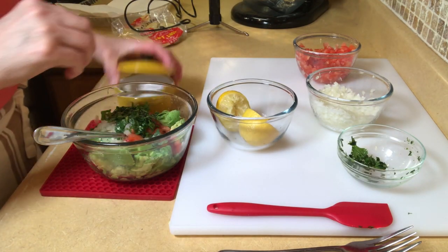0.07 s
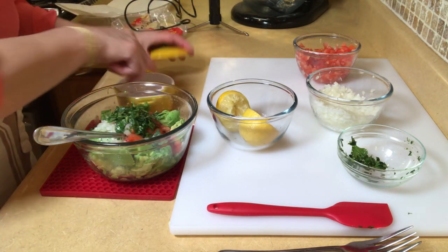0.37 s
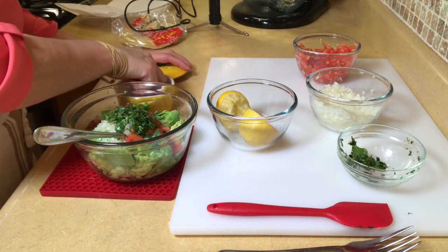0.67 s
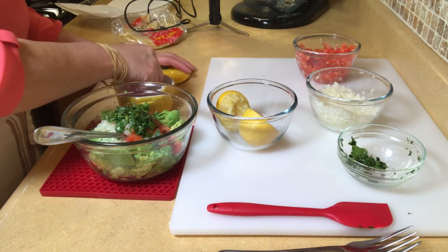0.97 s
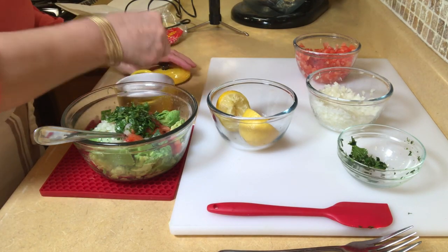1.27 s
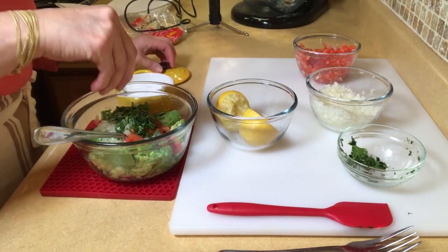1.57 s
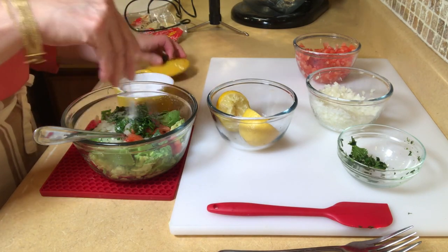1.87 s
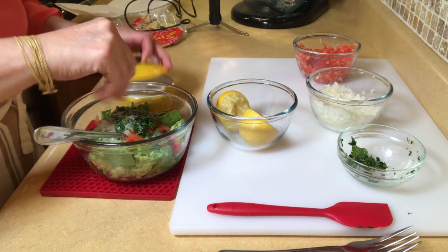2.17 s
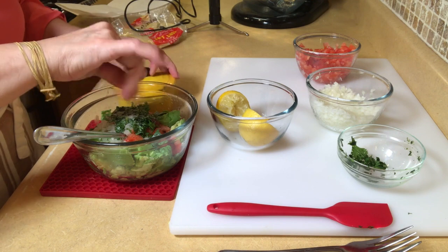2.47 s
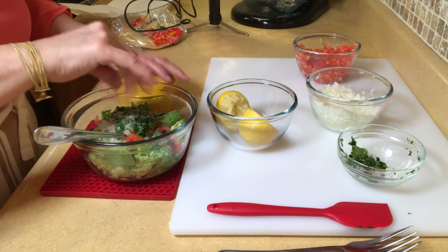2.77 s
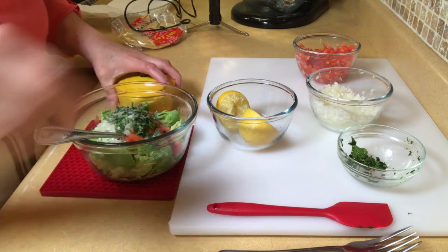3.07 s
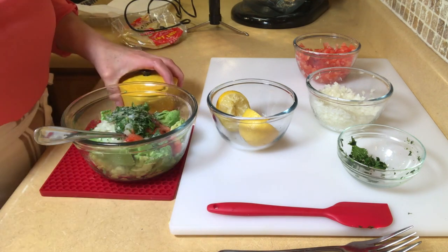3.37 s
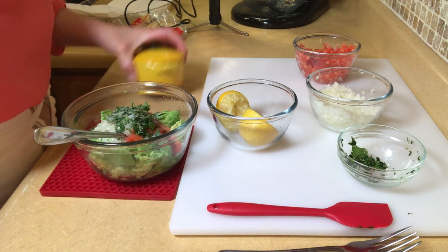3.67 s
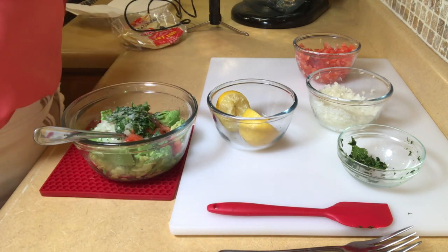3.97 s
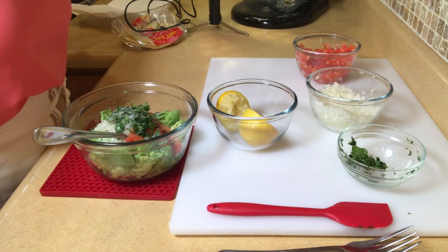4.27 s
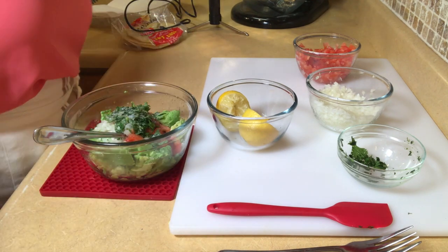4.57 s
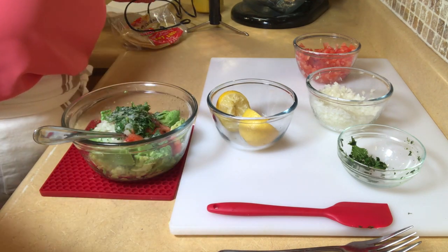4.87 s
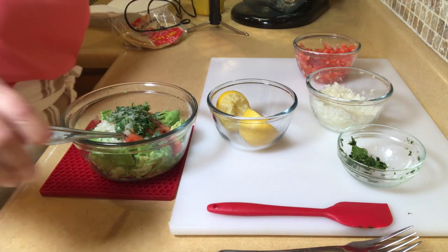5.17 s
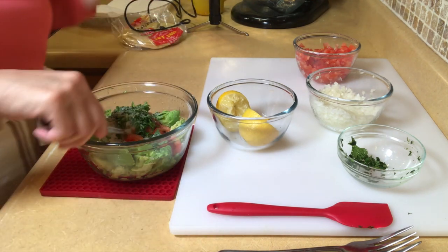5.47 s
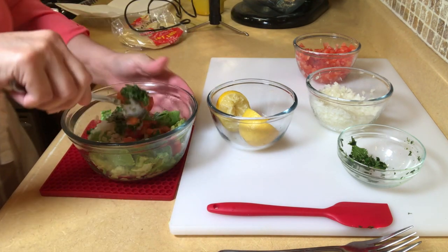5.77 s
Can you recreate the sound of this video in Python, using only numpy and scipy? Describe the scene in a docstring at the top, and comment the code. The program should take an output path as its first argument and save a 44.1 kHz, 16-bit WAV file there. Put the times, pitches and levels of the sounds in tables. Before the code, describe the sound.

A small salt cellar is set down on a kitchen counter with a knock, followed by lighter taps of its lid. Salt patters faintly onto food, then the lid goes back on with a quick cluster of ringing clinks. After a quiet stretch of soft hand slides, a hard knock shakes the counter and a spoon rattles in a glass bowl. It all sounds near, in a small, slightly reverberant kitchen with a faint appliance hum.

```python
"""Seasoning guacamole at a kitchen counter

A small lidded salt cellar is set down, opened, pinched from and closed with a clink; salt patters
on the food as a stream of tiny impacts. Later a hard knock shakes the counter and the spoon rattles
in the glass mixing bowl. Each blow excites damped modes of the countertop and the hollow cabinet
below. Hands slide and bangles tick in a small reverberant kitchen with a faint appliance hum."""
import sys
import numpy as np
from scipy import signal
from scipy.fft import rfft, irfft, next_fast_len
from scipy.io import wavfile
from scipy.ndimage import uniform_filter1d

SR = 44100
rng = np.random.default_rng(int(sys.argv[2]) if len(sys.argv) > 2 else 0)


def persist_wave(psi):
    """Save psi, clipped to +-1, as 16-bit WAV."""
    counts = np.round(np.clip(psi, -1, 1) * 32767).astype(np.int16)
    wavfile.write(sys.argv[1], SR, np.atleast_2d(counts).T)


N = 257367
TIME = np.arange(N) / SR
AGE = TIME[:SR * 3 // 5]   # time since a blow, in s


def from_db(db):
    """Amplitude ratio of a level in decibels."""
    return 10 ** (np.asarray(db) / 20)


def at_hz(points, hz):
    """Interpolation on a logarithmic frequency axis."""
    f, value = np.transpose(points)
    return np.interp(np.log(np.maximum(hz, 1)), np.log(f), value)


def add(track, s, sound):
    """Superposition: a sound joins the track at s seconds."""
    start = max(round(s * SR), 0)
    track[start:start + len(sound)] += sound[:N - start]


def low_pass(x, hz):
    """Second-order Butterworth low-pass."""
    return signal.sosfilt(signal.butter(2, min(hz, .45 * SR), fs=SR, output="sos"), x + 1e-18)


def high_pass(x, hz):
    """Fourth-order Butterworth high-pass."""
    return signal.sosfilt(signal.butter(4, hz, "high", fs=SR, output="sos"), x + 1e-18)


def coloured(source, spectrum):
    """Spectral shaping of a steady source, scaled to unit rms."""
    size = next_fast_len(len(source))
    gain = from_db(at_hz(spectrum, np.fft.rfftfreq(size, 1 / SR)))
    out = irfft(rfft(source, size) * gain, size)[:len(source)]
    return out / np.std(out)


def decay(t60):
    """Exponential damping: 60 dB are lost in t60 seconds."""
    return np.exp(-np.log(1000) * AGE / max(t60, 1e-3))


def burst(spectrum, t60):
    """Modal overlap: many modes of even strength merge into one decaying noise."""
    modes = rfft(rng.standard_normal(len(AGE)) * decay(t60))
    even = modes / np.sqrt(uniform_filter1d(abs(modes) ** 2, size=120))
    gain = from_db(at_hz(spectrum, np.fft.rfftfreq(len(AGE), 1 / SR)))
    out = irfft(even * gain, len(AGE)) * (AGE < 2 * t60)
    return out * np.sqrt(np.sum(decay(t60) ** 2) / np.sum(out ** 2))


def ring(modes, chatter=0, weight_db=lambda hz: 0, build_cycles=.01):
    """Free vibration as a sum of damped modes; contact chatter widens each line to chatter * f."""
    out = 0
    for k, (hz, db, t60) in enumerate(modes):
        phase = 2 * np.pi * hz * AGE
        if chatter:
            phase_walk = np.cumsum(rng.standard_normal(len(AGE))) * np.sqrt(2 * np.pi * chatter * hz / SR)
            phase = phase + uniform_filter1d(phase_walk, size=40)
        strength = from_db(db + weight_db(hz) + rng.standard_normal())   # no two blows are alike
        onset = 1 - np.exp(-AGE * hz / build_cycles)
        out = out + (-1) ** k * strength * np.sin(phase) * decay(t60) * onset
    return out


def grains(per_s, spread_db):
    """Shot noise: impulses of uneven size at random instants."""
    impulses = (rng.random(N) < per_s / SR) * rng.standard_normal(N)
    return impulses * from_db(spread_db * np.minimum(rng.exponential(1, N), 4))


def swells(rows):
    """Gaussian envelopes, each with a centre time, a peak level and a width (standard deviation)."""
    return sum(from_db(db) * np.exp(-.5 * ((TIME - s) / width) ** 2) for s, db, width in rows)


# spectrum of the room's air: f/Hz, level/dB
AIR_SPECTRUM = [(25, -20.5), (45, -6), (68, -9.5), (90, -5), (160, -9.5), (250, -11), (400, -14),
                (1000, -15), (1550, -18.5), (2300, -24), (4000, -29.5), (7000, -32.5), (10500, -39.5),
                (14500, -37), (16000, -44.5)]
# appliance tones: f/Hz, rms level/dB
HUM_TONES = [(60, -71.5), (120, -74), (154, -75.5)]


def room_tone(waver_rad=0.4, air_db=-65.5):
    """Background noise: broadband air and an appliance hum with slight random phase modulation."""
    hum = 0
    for hz, db in HUM_TONES:
        wander = coloured(rng.standard_normal(N), [(3, 0), (12, -25), (60, -90)])
        hum = hum + from_db(db) * np.sqrt(2) * np.sin(2 * np.pi * hz * TIME + waver_rad * wander)
    return hum + from_db(air_db) * coloured(rng.standard_normal(N), AIR_SPECTRUM)


# reverberation time of the kitchen: f/Hz, T60/s
REVERB_TIMES = [(100, 0.06), (500, 0.54), (1200, 0.43), (3500, 0.283), (8000, 0.33), (15000, 0.15)]
# energy that the kitchen returns: f/Hz, level/dB
REVERB_LEVELS = [(100, -11), (300, -6), (600, -12), (1000, -13), (1500, -10), (2200, -7), (3300, -8.5),
                 (8000, -11), (15000, -13)]
# reflections from splashback, ceiling and wall units: delay/s, level/dB
EARLY_REFLECTIONS = [(.0043, -18), (0.0117, -14), (0.017, -15.5)]


def kitchen(direct, build_s=0.0044):
    """Reverberation: early reflections and a diffuse tail that decays at its own rate in each band."""
    white = rfft(rng.standard_normal(len(AGE)))
    freqs = np.fft.rfftfreq(len(AGE), 1 / SR)
    edges = np.geomspace(40, 20000, 28)
    onset = 1 - np.exp(-(AGE / build_s) ** 2)
    tail = 0
    for low, high in zip(edges, edges[1:]):
        hz = np.sqrt(low * high)
        band = irfft(white * ((freqs >= low) & (freqs < high)), len(AGE))
        band = band * decay(at_hz(REVERB_TIMES, hz)) * onset
        unit_gain = np.sqrt(2 * (high - low) / SR / np.sum(band ** 2))
        tail = tail + from_db(at_hz(REVERB_LEVELS, hz)) * band * unit_gain
    out = direct + signal.fftconvolve(direct, tail)[:N]
    scattered = low_pass(direct, hz=2180)   # clutter breaks up the treble of the early reflections
    for delay, db in EARLY_REFLECTIONS:
        add(out, delay, from_db(db) * scattered)
    return out


# hands and cellar sliding on the counter: t/s, level/dB, width/s
SLIDE_STROKES = [(0.73, -68.5, 0.15), (0.79, -67, 0.011), (1.58, -67.5, 0.077), (1.69, -73, 0.012),
                 (1.76, -69, 0.015), (1.828, -68.5, 0.0067), (1.9, -63.5, 0.072), (3.41, -67.5, 0.088),
                 (3.63, -63.5, 0.024), (4.93, -73, 0.098)]
# spectrum of sliding: f/Hz, level/dB
SLIDE_SPECTRUM = [(200, 1), (600, 1.5), (1200, 4), (2200, -8.5), (4000, -16), (12000, -56)]
# fingers and sleeve brushing: t/s, level/dB, width/s
BRUSH_STROKES = [(2.785, -68.5, 0.01), (3.343, -76.5, 0.0071), (3.414, -72, 0.0079), (3.62, -73, 0.019),
                 (4.68, -71, 0.06), (4.959, -66, 0.033)]


def hands():
    """Friction noise: many tiny contacts make dull slides and brief bright brushes."""
    sliding = coloured(grains(per_s=7000, spread_db=5.0), SLIDE_SPECTRUM)
    brush_spectrum = [(1500, -2.5), (5000, 2.5), (9500, -10.5), (13500, -6.5)]
    brushing = coloured(grains(per_s=12000, spread_db=-3.0), brush_spectrum)
    return swells(SLIDE_STROKES) * sliding + swells(BRUSH_STROKES) * brushing


# bangles touching on the wrist: t/s, level/dB
BANGLE_TOUCHES = [(2.323, -67), (2.851, -69), (5.772, -61)]
# spectrum of a tick: f/Hz, level/dB
BANGLE_SPECTRUM = [(7000, -36), (13500, 0), (16000, -4)]


def bangles():
    """Light impacts between thin metal bangles excite high, quickly damped modes."""
    out = np.zeros(N)
    for s, db in BANGLE_TOUCHES:
        add(out, s, from_db(db) * burst(BANGLE_SPECTRUM, t60=0.027))
    return out


# fingers rubbing salt out over the bowl at full flow: t/s, duration/s, level/dB
SALT_PINCHES = [(1.575, .015, -90), (1.79, 0.25, -72.5), (2.265, .03, -82.5)]
# clumps let go at once: t/s, level/dB, width/s
SALT_SPURTS = [(1.688, -83, .004), (1.755, -83, .008), (1.875, -76, 0.0066), (2.028, -77, 0.0043),
               (2.055, -76, .007), (2.258, -74, 0.0024), (2.285, -81, 0.011)]
# spectrum of the crystals: f/Hz, level/dB
SALT_SPECTRUM = [(800, -2), (1400, -45), (3000, 3.5), (6000, 4.5), (10000, 2), (13000, 10), (16000, 0)]


def salt(gain_db=1, rise_db_per_s=127, fall_db_per_s=137):
    """Granular flow: crystals grind between the fingers and patter on the food as shot noise."""
    flow = swells(SALT_SPURTS)
    for s, hold_s, db in SALT_PINCHES:
        before = np.maximum(s - TIME, 0)   # the flow builds as the fingers loosen
        after = np.maximum(TIME - s - hold_s, 0)   # then trickles out
        flow = flow + from_db(db - rise_db_per_s * before - fall_db_per_s * after)
    crystals = grains(per_s=5000, spread_db=2.5)
    return from_db(gain_db) * flow * coloured(crystals, SALT_SPECTRUM)


# bright modes of the cellar lid, spoon and glassware: f/Hz, level/dB, T60/s
GLASS_MODES = [(3030, -2, .04), (3180, 0, .04), (3346, -1, .07), (3540, -4, .06), (3780, -3, .05),
               (4110, -2, .06), (4500, -6, .04), (4750, -7, .045), (6950, 0.5, .04), (7460, -5, 0.045),
               (8040, -6, 0.07), (8650, -8, .07), (10620, 0, .15), (10900, -3, .06), (13150, -4, .06)]
# cellar lid, spoon and glassware clinking: t/s, level/dB, favoured f/Hz, fall-off/(dB per octave)
GLASS_CONTACTS = [(0.000, -46, 3970, 30), (0.117, -57, 3700, 50), (0.13, -48.5, 3900, 64),
                  (2.55, -45, 10620, 90), (2.576, -27, 3180, 40), (2.5793, -32, 7700, 52),
                  (2.585, -37, 7200, 34), (5.02, -27.5, 3300, 30.5), (5.022, -40, 10620, 90),
                  (5.109, -47, 6950, 90), (5.108, -46, 3000, 60), (5.217, -46, 4280, 23),
                  (5.218, -52.5, 8070, 70), (5.258, -56.5, 4200, 60)]
CHATTER = .007   # glass buzzing against what it touches: line width as a fraction of frequency


def glass_clinks():
    """Selective excitation: each contact drives mainly the glass modes near one frequency."""
    out = np.zeros(N)
    for s, db, favoured_hz, falloff_db in GLASS_CONTACTS:
        clink = ring(GLASS_MODES, CHATTER, lambda hz: -falloff_db * abs(np.log2(hz / favoured_hz)))
        add(out, s, from_db(db) * clink)
    return out


# modes of the salt cellar: f/Hz, level/dB, T60/s
CELLAR_MODES = [(3130, -16, .06), (3240, -14, .12), (3274, 0, .19), (3296, -12, .28), (3450, -21, .07),
                (3535, -17, .1), (5150, -16, .02), (6850, -25, .08), (8210, -17, .14), (11690, -32, .15),
                (14560, -21, .12), (15550, -33, .12)]
# cellar meeting lid or counter: t/s, level/dB, tilt/(dB per octave), main mode f/Hz, T60 factor
CELLAR_CONTACTS = [(1.008, -37, -14, 3335, 0.17), (2.361, -32, -8, 3274, 0.97),
                   (2.388, -34.5, -2.5, 3267, 0.69), (2.394, -35.5, -2, 3274, 0.5),
                   (2.401, -45, -12, 3310, 0.64), (2.519, -57, 5, 3250, 0.8), (2.550, -28.5, 4, 3293, 0.8),
                   (2.579, -38.5, -3, 3247, 1.2), (5.023, -31.5, 3.5, 3280, .6)]


def cellar_clinks():
    """Damped vibration of the cellar: a sharper touch lifts its upper modes, a firm grip damps it."""
    out = np.zeros(N)
    main_hz = max(CELLAR_MODES, key=lambda mode: mode[1])[0]
    for s, db, tilt_db, pitch_hz, t60_factor in CELLAR_CONTACTS:
        held = [(hz * pitch_hz / main_hz, level, t60 * t60_factor) for hz, level, t60 in CELLAR_MODES]
        clink = ring(held, CHATTER, lambda hz: tilt_db * np.log2(hz / pitch_hz))
        add(out, s, from_db(db) * clink)
    return out


# modes of the hollow cabinet: f/Hz, level/dB, T60/s
CABINET_MODES = [(103.9, 3.5, 0.27), (158.8, 1, 0.22), (217.3, -4.5, 0.14), (252, -9.5, 0.1),
                 (340, -0.5, 0.031), (417.7, -6.5, 0.13)]


def cabinet_boom(lowest_hz, falloff_db_per_octave=45):
    """Resonance of the cabinet under the counter; modes below lowest_hz are only weakly driven."""
    return ring(CABINET_MODES, build_cycles=1.32,
                weight_db=lambda hz: -falloff_db_per_octave * max(np.log2(lowest_hz / hz), 0))


# modes of the counter and its nook, struck by the bowl, the cellar or the lid: f/Hz, level/dB, T60/s
MODES_AT_BOWL = [(420, -14, 0.15), (458, -12, 0.23), (511, -12, 0.32), (565, -9, 0.24), (602, -2, 0.11),
                 (700, -8, 0.26), (759, -8, 0.2), (834, -12, 0.25), (896, -4, 0.1), (1007, -15, 0.3),
                 (1059, 0, 0.16), (1100, -8, 0.22), (1161, -4, 0.11), (1223, -1.5, 0.21), (1279, -3, 0.13),
                 (1351, -12, 0.26), (1464, -12, 0.22), (1520, -11, 0.12), (1583, -9, 0.22),
                 (1670, -10, 0.18), (1804, -6, 0.13), (1958, -18, 0.22), (2196, -21, 0.22),
                 (2562, -24, 0.21)]
MODES_AT_CELLAR = [(415, -6, 0.23), (495, -6, 0.19), (513, -16, 0.44), (635, -15, 0.33), (673, -9, 0.2),
                   (755, -14, 0.3), (898, -14, 0.4), (953, 0, 0.16), (1034, -4, 0.22), (1120, -9, 0.24),
                   (1190, -2, 0.14), (1238, -6, 0.14), (1416, -14, 0.24), (1518, -20, 0.28),
                   (1583, -22, 0.31), (1658, -15, 0.22), (1850, -18, 0.24)]
MODES_AT_LID = [(470, -12, 0.18), (517, -18, 0.41), (598, -5, 0.21), (904, -15, 0.23), (1070, -1, 0.09),
                (1125, 2, 0.08), (1152, -12, 0.31), (1249, -17, 0.38), (1360, -2, 0.14), (1405, -5, 0.2),
                (1540, -7, 0.12), (1669, -5, 0.087), (2003, -14, 0.17), (2159, -20, 0.22), (2350, -9, 0.06)]


def counter_ring(spot, contact_hz):
    """The point of excitation decides which modes of the counter and its nook ring on."""
    modes = {"bowl": MODES_AT_BOWL, "cellar": MODES_AT_CELLAR, "lid": MODES_AT_LID}[spot]
    return low_pass(ring(modes, build_cycles=1.8), contact_hz)


# spectrum of hard contact, raised where the glass has clusters of modes: f/Hz, level/dB
CRACK_SPECTRUM = [(500, -10), (2000, 8), (2750, -0.5), (3500, 5), (5000, 0), (7500, -1), (8250, -5.5),
                  (9200, -1.5), (10200, -7.5), (10650, 2), (11300, -2), (12200, -11), (13600, -8),
                  (14600, -2.5), (15100, -18), (15600, -6)]


def contact_crack():
    """Hard contact is a broadband transient: a snap at first touch, then a short buzz."""
    snap = from_db(5) * burst(CRACK_SPECTRUM, t60=0.02)
    buzz = burst(CRACK_SPECTRUM, t60=0.09)
    return snap + buzz


# spectrum of the countertop's dense, short-lived modes: f/Hz, level/dB
THUD_SPECTRUM = [(50, -28), (110, -25), (200, 3), (350, -5), (600, 3), (1000, 6), (1500, -0.5), (2200, -3),
                 (2750, -8.5), (3400, -7), (5000, -13), (9000, -17), (16000, -60.5)]


def counter_thud(pitch_hz, contact_hz):
    """Elastic impact: the object springs on the countertop; a softer contact is slower and duller."""
    spring = from_db(3) * np.sin(2 * np.pi * pitch_hz * AGE) * decay(t60=0.02)
    dense_modes = from_db(-2) * burst(THUD_SPECTRUM, t60=0.04)
    onset = 1 - np.exp(-AGE * contact_hz)
    return low_pass((spring + dense_modes) * onset, contact_hz)


# bass limit of a blow: boom level/dB, lowest f/Hz
BASS_LIMIT = [(-35, 134), (-26, 99)]
# blows on the countertop (the row at 5.025 s is a duller echo of the hard knock, 4 ms later): t/s, spot struck,
# thud level/dB, thud f/Hz, contact cut-off f/Hz, ring level/dB, boom level/dB, crack level/dB
BLOWS = [(0.000, "cellar", -15.5, 1005, 1790, -30, -30.5, -56),
         (0.018, "cellar", -27.5, 1090, 1670, -68, -57, -88),
         (0.119, "cellar", -45, 694, 1800, -51.5, -45, -72), (0.808, "lid", -36, 610, 890, -56, -50.5, -88),
         (0.957, "lid", -50.5, 1110, 1400, -66, -84, -85), (1.005, "lid", -27, 1247, 3960, -37, -48, -71),
         (1.009, "lid", -42.5, 505, 2500, -71, -41.5, -84), (1.057, "lid", -41, 1430, 2000, -54, -63, -90),
         (1.541, "lid", -51, 586, 644, -49, -80, -85), (1.640, "lid", -53, 855, 1100, -65, -80, -92),
         (1.692, "lid", -49.5, 930, 1100, -61, -84, -92),
         (1.8418, "lid", -40.5, 1280, 2120, -51.5, -71, -90), (1.846, "lid", -38, 640, 900, -66, -60, -90),
         (1.884, "lid", -48.5, 1020, 1700, -56, -81, -88),
         (2.361, "cellar", -17.5, 962, 2300, -38, -62, -70),
         (2.388, "cellar", -24.5, 1010, 2600, -36.5, -43.5, -71),
         (2.401, "cellar", -26.5, 990, 2200, -36, -46, -76),
         (2.521, "cellar", -41.5, 910, 1300, -52.5, -94, -72),
         (2.5498, "cellar", -19.5, 1050, 3000, -35, -41.5, -34),
         (2.562, "cellar", -26, 1100, 4000, -30.5, -37.5, -48),
         (2.572, "cellar", -29, 606, 1110, -44, -46, -71),
         (2.5769, "cellar", -21, 490, 1800, -34, -33, -42.5),
         (2.886, "cellar", -37.5, 1010, 1070, -53.5, -53.5, -80),
         (3.618, "cellar", -50, 1714, 6000, -66, -54.5, -70.5),
         (5.0206, "bowl", -11.5, 1128, 3500, -24.5, -25, -40),
         (5.025, "bowl", -15, 714, 1300, -43.5, -43, -46.5),
         (5.0351, "bowl", -18.5, 1470, 1800, -40.5, -46.5, -60),
         (5.0385, "bowl", -10.5, 1160, 1550, -45, -37.5, -50),
         (5.108, "bowl", -29, 1400, 2000, -71, -65, -66), (5.216, "bowl", -34, 759, 1600, -56, -59, -66)]


def knocks():
    """Impulse response of the counter: returns the impacts and the resonances that they leave."""
    impacts, resonances = np.zeros(N), np.zeros(N)
    for s, spot, thud_db, pitch_hz, contact_hz, ring_db, boom_db, crack_db in BLOWS:
        lowest_hz = np.interp(boom_db, *np.transpose(BASS_LIMIT))   # only heavy blows drive deep modes
        thud = high_pass(counter_thud(pitch_hz, contact_hz), lowest_hz)
        add(impacts, s, from_db(thud_db) * thud)
        add(impacts, s, from_db(crack_db) * contact_crack())
        add(resonances, s, from_db(ring_db) * counter_ring(spot, contact_hz))
        add(resonances, s, from_db(boom_db) * cabinet_boom(lowest_hz))
    return impacts, resonances


def scene():
    """Superposition: the contact sounds reverberate; resonances and room tone add to them."""
    impacts, resonances = knocks()
    direct = impacts + cellar_clinks() + glass_clinks() + salt() + hands() + bangles()
    return (kitchen(direct) + resonances + room_tone())[None]


def record(dry):
    """Band limiting: a steep elliptic low-pass removes the highest treble."""
    cutoff_hz = 15800
    return signal.sosfilt(signal.ellip(10, .2, 70, cutoff_hz, fs=SR, output="sos"), dry)


dry = scene()
out = record(dry)
persist_wave(out)
```